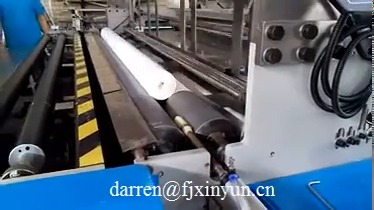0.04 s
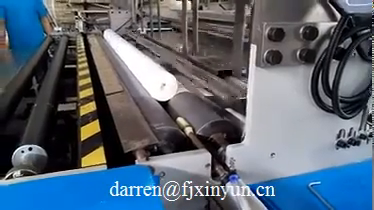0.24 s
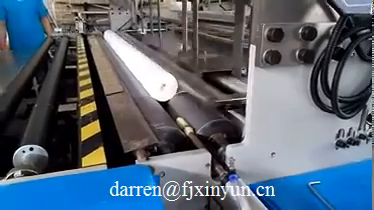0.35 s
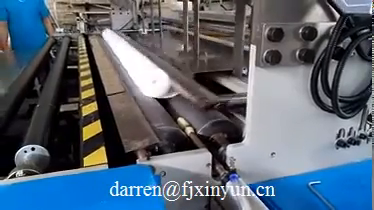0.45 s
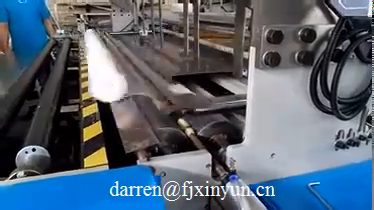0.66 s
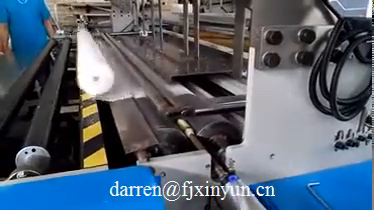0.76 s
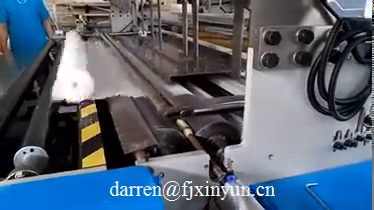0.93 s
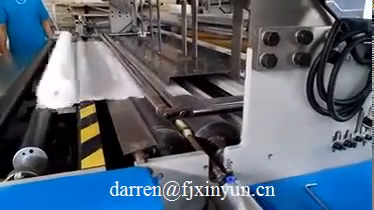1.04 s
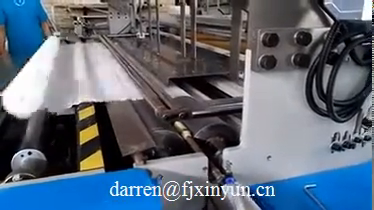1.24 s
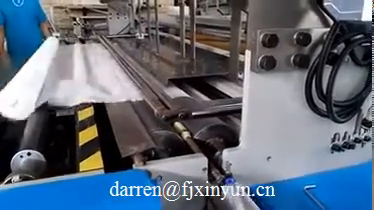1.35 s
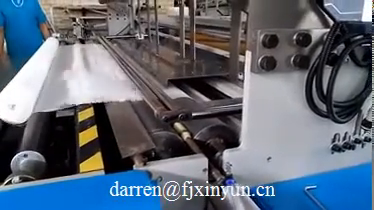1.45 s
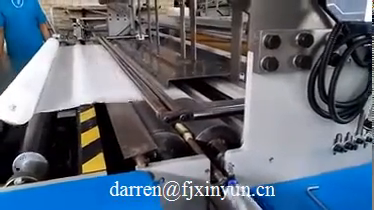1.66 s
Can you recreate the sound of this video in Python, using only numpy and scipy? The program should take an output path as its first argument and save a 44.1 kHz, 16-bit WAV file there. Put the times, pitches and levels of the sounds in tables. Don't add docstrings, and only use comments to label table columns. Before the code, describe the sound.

Close phone pickup of a factory machine: pneumatic clunk, latch knock and low frame rumble, quick metallic chatter, one hard ringing slam with fluttering echoes, then soft sheet ticks over steady machine hum.

```python
import sys
import numpy as np
from scipy import signal
from scipy.fft import rfft, irfft, next_fast_len
from scipy.io import wavfile
from scipy.ndimage import map_coordinates

SR = 44100
rng = np.random.default_rng(int(sys.argv[2]) if len(sys.argv) > 2 else 0)


def volts_from_db(level):
    exponent = np.asarray(level, float) / 20
    return 10 ** exponent


def unload_wav(signal):
    wavfile.write(
        sys.argv[1],
        SR,
        np.round(np.clip(np.atleast_2d(signal).T, -1, 1) * 32767).astype(np.int16),
    )


N = 74970


def unit(x):
    return x / np.sqrt(np.mean(x ** 2) + 1e-20)


def along(points, hz):
    f, v = np.transpose(points)
    return np.interp(np.log(hz + 1), np.log(f + 1), v)


def curve(rows):
    s, v = np.transpose(rows)
    return np.interp(np.arange(N) / SR, s, v)


def wobble(rate):
    knots = rng.standard_normal(int(N * rate / SR) + 4)
    return map_coordinates(knots, [np.arange(N) * rate / SR])


def filtered(x, response):
    m = next_fast_len(N + 8192)
    hz = np.fft.rfftfreq(m, 1 / SR)
    return irfft(rfft(x, m) * response(hz), m)[..., :N]


def noise(spectrum):
    colour = lambda hz: volts_from_db(along(spectrum, hz)) * (hz > 20)
    return unit(filtered(rng.standard_normal(N), colour))


# frequency in Hz, likeness from 0 to 1.
PORT_LIKENESS = [(60, 1), (300, 0.88), (700, 0.62), (1500, 0.36), (3000, 0.15), (8000, 0.023)]


def spread(a, b):
    turn = lambda hz: np.arccos(np.clip(along(PORT_LIKENESS, hz), -1, 1)) / 2
    mid, side = filtered(np.array([a, b]), lambda hz: np.array([np.cos(turn(hz)), np.sin(turn(hz))]))
    return np.array([mid + side, mid - side])


def wide_noise(spectrum):
    return spread(noise(spectrum), noise(spectrum))


def strikes(blows, modes, spectrum, ring_db, noise_db, crack_db, ring_scale, shimmer_rad=.6):
    attack_s, crack_t60_s = .0006, .045
    scatter_db, phase_rad = 1.5, 0.69
    apart_rad = 0.37
    grain_db = 2.0
    sides = np.array([[.5], [-.5]])
    t = np.arange(SR * 3 // 4) / SR
    rise = (1 - np.exp(-t / attack_s)) ** 2
    drift = [np.resize(shimmer_rad * wobble(26.6), len(t)) for _ in modes]
    rings, power = np.zeros((2, N + SR)), np.zeros(N + SR)
    for s, db, t60 in blows:
        ring = 0
        for (hz, mode_db, mode_t60), unsteady in zip(modes, drift):
            level_luck, phase_luck, side_luck = rng.standard_normal(3)
            decay = volts_from_db(mode_db + scatter_db * level_luck - 60 * t / (ring_scale * mode_t60))
            apart = apart_rad * side_luck * hz / 1000 * sides
            ring = ring + decay * np.sin(2 * np.pi * hz * t + phase_rad * phase_luck + unsteady + apart)
        at = round(s * SR)
        rings[:, at:at + len(t)] += volts_from_db(db + ring_db) * ring * rise
        clatter = volts_from_db(noise_db - 60 * t / max(t60, .01))
        crack = volts_from_db(crack_db - 60 * t / crack_t60_s)
        power[at:at + len(t)] += (rise * volts_from_db(db)) ** 2 * (clatter ** 2 + crack ** 2)
    grain = volts_from_db(grain_db * wobble(180))
    return rings[:, :N] + np.sqrt(power[:N]) * grain * wide_noise(spectrum)


# frequency in Hz, level in dB.
HALL_COLOUR = [(15, -55), (25, -54), (193, 0), (313, -9.5), (349, -6), (1370, -23.5), (2770, -21),
               (11500, -99), (15500, -110)]
# frequency in Hz, amplitude in dB.
HUM_TONES = [(205, -54.5), (375, -48), (540, -49.5), (750, -50), (835, -52), (2070, -69.5), (5400, -81.5)]


def hall_hum():
    t = np.arange(N) / SR
    rumble_db, swell_db = -40, 2
    out = volts_from_db(rumble_db + swell_db * wobble(8.62)) * wide_noise(HALL_COLOUR)
    for hz, db in HUM_TONES:
        level = volts_from_db(db + 4.8 * wobble(16.0))
        out = out + level * np.sin(2 * np.pi * hz * t + 3.25 * wobble(10))
    return out


# time in seconds, level in dB.
AIR_FLOW = [(0, -49.5), (.1, -60), (.195, -62.5), (.206, -57), (.28, -50), (.36, -49.5), (.45, -48.5),
            (.57, -49), (.63, -49), (.69, -50), (.74, -53), (1.3, -64), (1.7, -65.5)]
# frequency in Hz, level in dB.
HISS_COLOUR = [(300, -11.5), (500, -1.5), (900, -4.5), (1400, -23), (2300, -12), (3500, -13), (10500, -28),
               (15500, -45.5)]


def exhaust_air():
    level_db = 11
    return volts_from_db(curve(AIR_FLOW) + level_db + 0.65 * wobble(31.05)) * wide_noise(HISS_COLOUR)


# time in seconds, level in dB.
FRAME_SHAKING = [
    (0.0, -28.5),
    (0.174, -52.5),
    (0.222, -30),
    (0.822, -33.5),
    (0.87, -27),
    (0.974, -32.5),
    (1.102, -33),
    (1.268, -45.5),
    (1.68, -45),
    (1.7, -44),
]
# frequency in Hz, level in dB.
FRAME_COLOUR = [(15, -55), (25, -14.5), (76, 7), (184, -5.5), (221, -8.5), (352, -6), (400, -4.5),
                (520, -14.5), (880, -120)]


def frame_rumble():
    lumpy_db = 2.5
    return volts_from_db(curve(FRAME_SHAKING) + lumpy_db * wobble(25.27)) * wide_noise(FRAME_COLOUR)


# start in seconds, peak level in dB, noise t60 in seconds.
CYLINDER_BLOWS = [
    (0.203, -12.5, 0.51),
    (0.225, -6.5, 0.054),
    (0.483, -23.5, 0.087),
    (0.508, -21.5, 0.49),
    (0.579, -23.5, 0.2),
    (0.64, -23.5, 1),
]
# frequency in Hz, level in dB, t60 in seconds.
CYLINDER_MODES = [(307, -6, .3), (475, -3, .12), (620, -5, .2), (700, -5, .2), (1110, -4, .1),
                  (1500, -6, .05), (2261, -5, .09), (3036, -16, .06)]
# frequency in Hz, level in dB.
CYLINDER_NOISE = [(35, -43), (60, -42), (501, -4), (1880, -14.5), (2210, -8), (2530, -13), (10900, -51),
                  (12200, -73), (14000, -59)]


def cylinder_clunks():
    return strikes(CYLINDER_BLOWS, CYLINDER_MODES, CYLINDER_NOISE,
                   ring_db=-9, noise_db=-8.5, crack_db=-9.5, ring_scale=0.54)


# start in seconds, level in dB, noise t60 in seconds.
VALVE_SNAPS = [
    (.2038, -29.5, 0.037),
    (.2115, -41, 0.046),
    (.2262, -31, 0.043),
]
# frequency in Hz, level in dB, t60 in seconds.
SPOOL_MODES = [(1467, 18, 0.028), (2320, -2, 0.044), (3850, -17, 0.1), (5400, -4, .03), (6200, -13, .03)]
# frequency in Hz, level in dB.
SNAP_NOISE = [(1000, -32), (3000, 4), (6000, 1), (9000, -1), (12000, -9), (15500, -22)]


def valve_snap():
    return strikes(VALVE_SNAPS, SPOOL_MODES, SNAP_NOISE, ring_db=-6, noise_db=-11, crack_db=-15, ring_scale=0.9)


# start in seconds, level in dB, frequency in Hz.
FRAME_THUDS = [(.229, -9.5, 235), (0.253, -11.5, 70), (.268, -15, 149), (.412, -19.5, 129),
               (0.484, -27, 298), (.615, -19.5, 231), (1.255, -23, 377), (1.35, -31, 393),
               (1.46, -24.5, 210), (1.545, -25.5, 198), (0.291, -15.5, 111), (0.601, -19, 206),
               (0.701, -19, 91), (0.841, -13, 221), (0.874, -20, 73.4), (1.119, -23, 67), (1.219, -29, 70)]


def thuds():
    t = np.arange(N) / SR
    t60_s, rise_s = 0.055, 0.0014
    out = np.zeros(N)
    for s, db, hz in FRAME_THUDS:
        since = np.maximum(t - s, 0)
        decay = volts_from_db(db - 60 * since / t60_s) * (1 - np.exp(-since / rise_s))
        out += decay * np.sin(2 * np.pi * hz * since)
    return out


# start in seconds, level in dB, noise t60 in seconds.
LATCH_BLOWS = [
    (.3845, -10.5, 0.18),
    (.398, -24, 0.19),
    (.41, -22, 0.17),
    (.421, -20, 0.11),
    (.438, -26, 0.098),
]
# frequency in Hz, level in dB, t60 in seconds.
BOLT_MODES = [(459.5, 3.5, 0.097), (616, -5.5, 0.15), (1039, -1.5, 0.068), (1287, 0, 0.056),
              (1663, -6.5, 0.14), (2082, -13, 0.16), (3130, -7.5, 0.086), (3570, -14, 0.028)]
# frequency in Hz, level in dB.
BOLT_NOISE = [(150, -32), (450, -1.5), (1100, 0.5), (1800, -6), (3100, -9.5), (4600, -17.5), (7000, -37.5),
              (12000, -60)]


def latch():
    return strikes(LATCH_BLOWS, BOLT_MODES, BOLT_NOISE, ring_db=-9, noise_db=-9.5, crack_db=-28, ring_scale=0.72)


# start in seconds, level in dB, noise t60 in seconds.
EDGE_TOUCHES = [
    (.708, -14.5, 0.045),
    (.719, -14.5, 0.13),
    (.729, -14, 0.094),
    (.744, -22, 0.15),
    (.765, -19.5, 0.16),
    (.800, -20, 0.18),
]
# frequency in Hz, level in dB, t60 in seconds.
EDGE_MODES = [(1569, -4, 0.24), (2050, -9, .1), (2444, -0.5, .2), (2700, 0, .12), (3580, -12, 0.1),
              (4030, -10, 0.19)]
# frequency in Hz, level in dB.
CHATTER_NOISE = [(700, -50), (1400, 7), (2600, 1), (4500, -14), (7500, -22.5), (9000, -28), (14000, -100)]


def edge_chatter():
    return strikes(EDGE_TOUCHES, EDGE_MODES, CHATTER_NOISE, ring_db=-9, noise_db=-5.0, crack_db=-6, ring_scale=0.88)


# start in seconds, level in dB, noise t60 in seconds.
PLATE_BLOWS = [(.726, -11, 0.099), (.737, -8, 0.077), (.752, -8.5, 0.11), (.759, -11.5, 0.1),
               (.768, -20, 0.18), (.785, -14.5, 0.24), (.800, -15.5, 0.27), (.805, -14, 0.23),
               (.817, -12.5, 0.2), (.845, -16.5, 0.07), (.866, -34, 0.1)]
# frequency in Hz, level in dB, t60 in seconds.
PLATE_MODES = [(560, -8, .2), (625, -10, .3), (684, -6, .4), (834, 0, .5), (948, -9, .3), (991, -5, .3),
               (1100, -8, .2), (1555, -7, .2), (2444, -14, .3), (2692, -15, .3)]
# frequency in Hz, level in dB.
RATTLE_NOISE = [(150, -18), (550, 1.5), (900, 2.5), (1300, -6), (2000, -12), (2800, -14), (4500, -20.5),
                (9000, -81)]


def plate_rattle():
    return strikes(PLATE_BLOWS, PLATE_MODES, RATTLE_NOISE, ring_db=-11, noise_db=-7, crack_db=-18, ring_scale=0.91)


# start in seconds, level in dB, noise t60 in seconds.
PIN_BLOWS = [
    (.8955, -24, 0.039),
    (.8985, -24.5, 0.084),
    (.906, -26, 0.089),
]
# frequency in Hz, level in dB, t60 in seconds.
PIN_MODES = [(4280, 2.5, 0.033), (4687, -3, 0.21), (5760, -9.5, 0.18), (7600, 4, 0.02), (7860, -2, .035),
             (8400, -16, 0.031), (9300, -23, 0.081)]
# frequency in Hz, level in dB.
PIN_CLICK = [(2500, -40), (4000, 2.5), (4800, -8), (6400, -7.5), (7700, -5), (9000, -19), (10500, -23),
             (13000, -86)]


def stop_pin():
    return strikes(PIN_BLOWS, PIN_MODES, PIN_CLICK, ring_db=-8.5, noise_db=-9, crack_db=-10.5, ring_scale=0.89)


# start in seconds, level in dB, noise t60 in seconds.
SLAM_BLOW = [
    (.8972, -5, 0.69),
]
# frequency in Hz, level in dB, t60 in seconds.
STOP_MODES = [(372, -6, .11), (505, -9, .5), (682, -11, .8), (786, -12, .9), (872, -8, .15), (959, -11, .9),
              (600, -4, .08), (1028, -10, 1.05), (1053, -17, .6), (1820, -9, .7), (2067, -9.5, 1.6),
              (2245, -15, .5), (2444, -12, .55), (705, -10, .25)]
# frequency in Hz, level in dB.
CRASH_NOISE = [(150, -22), (380, -1), (1000, 2.5), (1400, -5.5), (2500, -8.5), (4500, -20.5), (7600, -38),
               (9500, -38), (14000, -110)]


def slam():
    return strikes(SLAM_BLOW, STOP_MODES, CRASH_NOISE,
                   ring_db=-7, noise_db=-9, crack_db=-9, ring_scale=.8, shimmer_rad=.3)


# time in seconds, level in dB, frequency in Hz, width in seconds.
ROLLER_PULSES = [
    (.9012, -5.5, 890, 0.0036),
    (.908, -10, 960, 0.0027),
    (.9145, -15, 890, 0.0026),
]


def roller():
    t = np.arange(N) / SR
    start_s, trip_s, loss_db = .8985, .0738, 6.5
    base_hz, climb_hz = 910, 32
    packet_s, stretch = .004, 1.4
    packet = lambda since, hz, width: np.exp(-(since / width) ** 2) * np.sin(2 * np.pi * hz * since)
    out = np.zeros(N)
    for s, db, hz, width in ROLLER_PULSES:
        out += volts_from_db(db) * packet(t - s, hz, width)
    for trip in range(1, 5):
        since = t - start_s - trip * trip_s
        width = packet_s * stretch ** (trip - 1)
        out += volts_from_db(-loss_db * trip) * packet(since, base_hz + climb_hz * trip, width)
    return out


# start in seconds, peak level in dB, noise t60 in seconds.
SHEET_TICKS = [
    (1.1644, -28.5, 0.096),
    (1.241, -31, 0.094),
    (1.29, -52, 0.089),
    (1.3232, -34, 0.1),
    (1.5504, -35.5, 0.088),
    (1.5993, -48, 0.073),
    (1.6394, -36, 0.1),
]
# frequency in Hz, level in dB.
PAPER_NOISE = [(1200, -50), (1800, 9.5), (3000, 7), (5000, -5.5), (8000, -10.5), (10000, -10), (12000, -31),
               (15500, -88)]


def paper_ticks():
    paper_mode = [(2880, -8, 0.038)]  # Hz, dB, t60 in seconds
    return strikes(SHEET_TICKS, paper_mode, PAPER_NOISE, ring_db=-2, noise_db=-7.5, crack_db=-22, ring_scale=0.91)


# frequency in Hz, t60 in seconds.
HALL_DECAY = [(200, 1), (1000, 1), (4000, 0.6), (10000, 0.34)]


def room(x):
    hz, t, z = signal.stft(rng.standard_normal((2, SR)), SR, nperseg=256)
    decay = volts_from_db(-60 * t / along(HALL_DECAY, hz)[:, None])
    tail = signal.istft(z * decay, SR, nperseg=256)[1]
    delayed = np.pad(tail, ((0, 0), (300, N)))[:, :N]
    tail = spread(*delayed)
    return signal.fftconvolve(x[None], tail / np.linalg.norm(tail[0]), axes=1)[:, :N]


def scene():
    background = hall_hum() + exhaust_air() + frame_rumble()
    near = cylinder_clunks() + valve_snap() + thuds() + latch()
    near = near + edge_chatter() + plate_rattle() + stop_pin() + slam() + paper_ticks()
    room_db = -7
    return near + roller() + volts_from_db(room_db) * room(near.mean(0)) + background


# frequency in Hz, left minus right in dB.
PORT_TILT = [(60, 0.3), (500, -0.3), (1200, -0.5), (2500, -3), (5000, -7.5), (9000, -14.5), (13000, -26.5)]


def band_limit(x):
    return signal.sosfilt(signal.butter(12, 15610, fs=SR, output="sos"), x)


def record(dry):
    low_cut_hz, top_hz, left_lag_s = 37.8, 15600, 0.00015
    side = np.array([[1], [-1]])

    def port_response(hz):
        cut = (1j * hz / (low_cut_hz + 1j * hz)) ** 3 * (hz < top_hz)
        tilt = volts_from_db(side * along(PORT_TILT, hz) / 2)
        lag = np.exp(-1j * np.pi * side * hz * left_lag_s)
        return cut * tilt * lag

    ports = filtered(dry, port_response)
    soft = ports / (1 + np.abs(ports) ** 6) ** (1 / 6)
    return band_limit(soft)


dry = scene()
out = record(dry)
unload_wav(out)
```